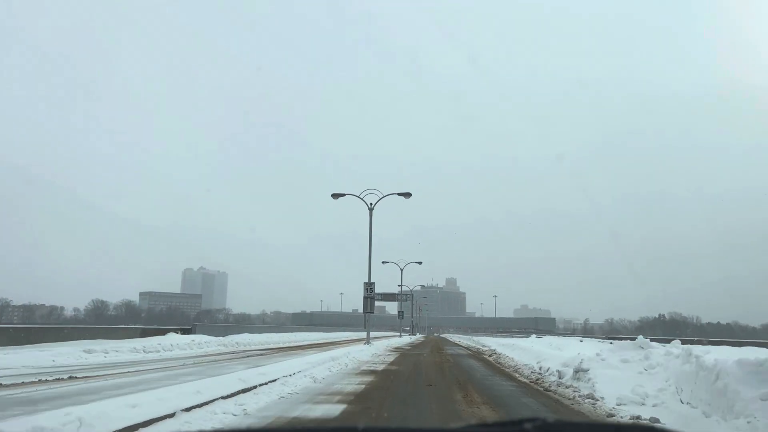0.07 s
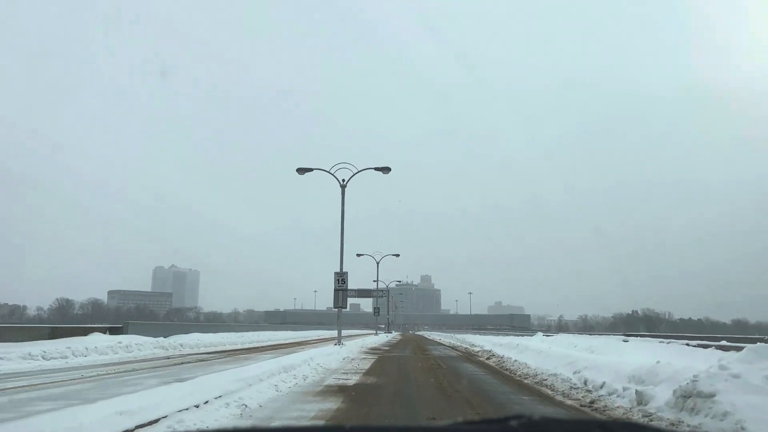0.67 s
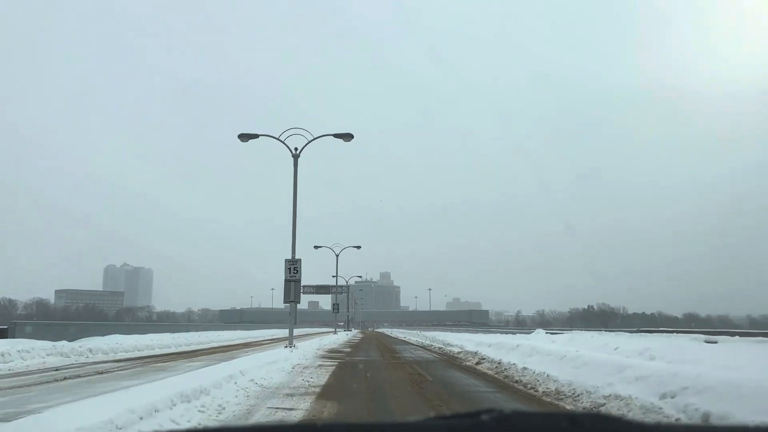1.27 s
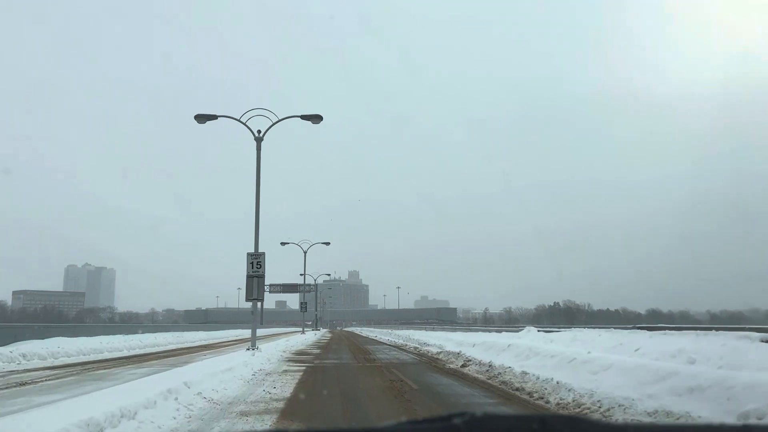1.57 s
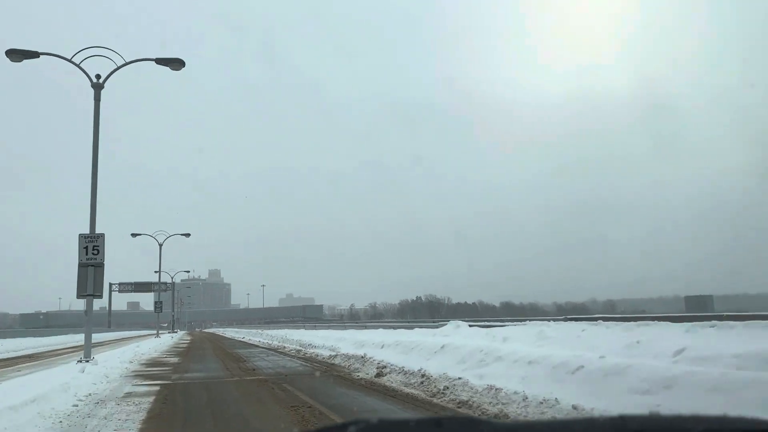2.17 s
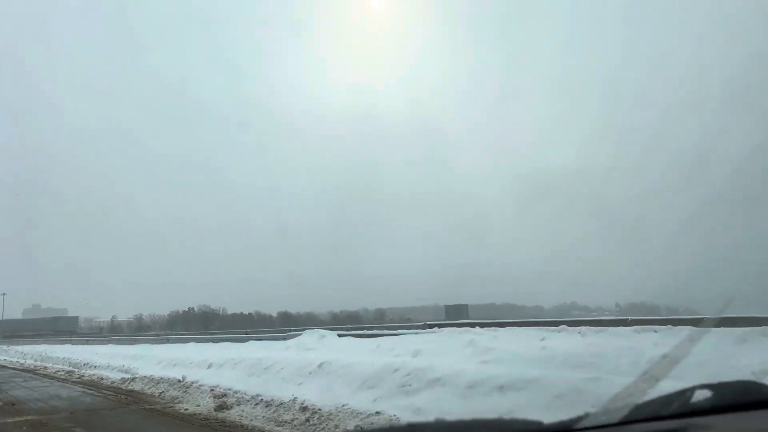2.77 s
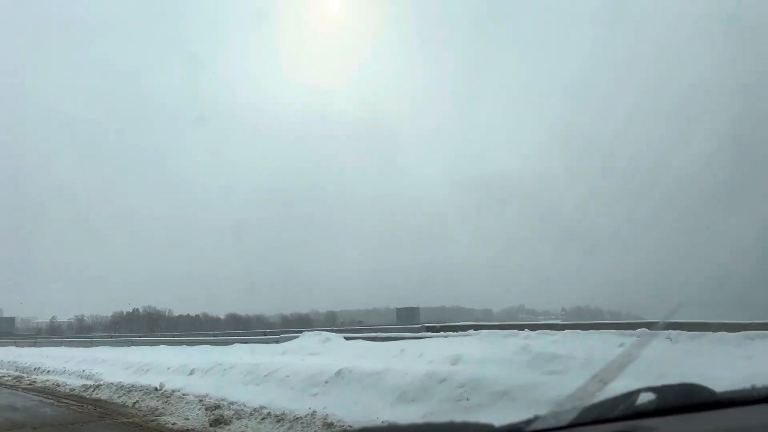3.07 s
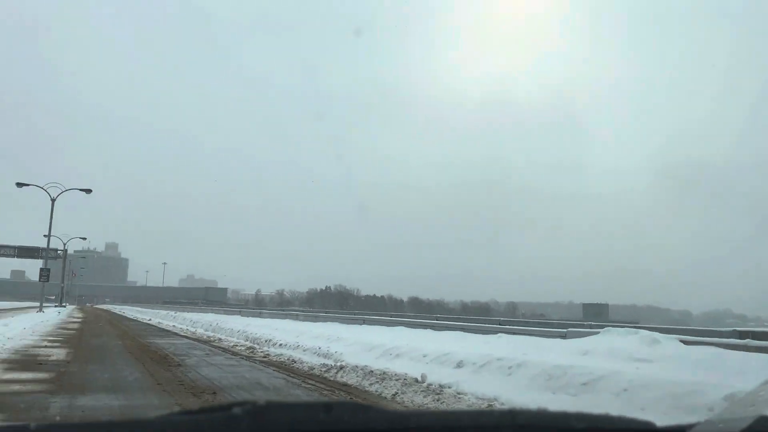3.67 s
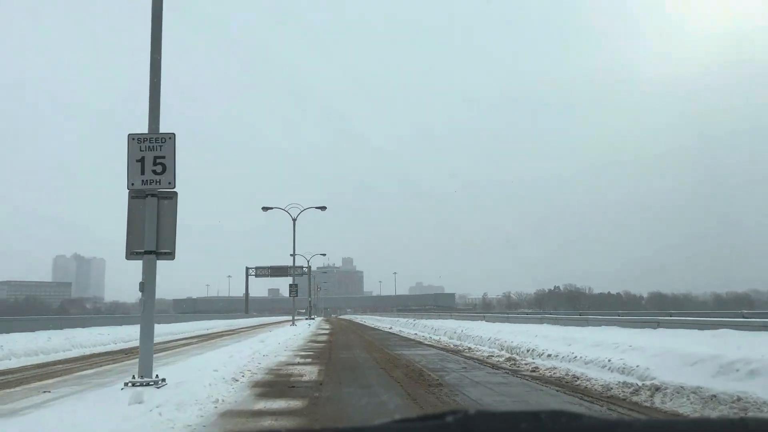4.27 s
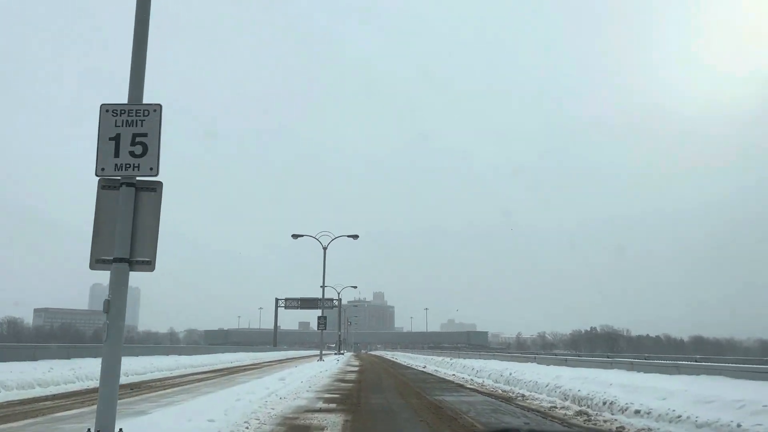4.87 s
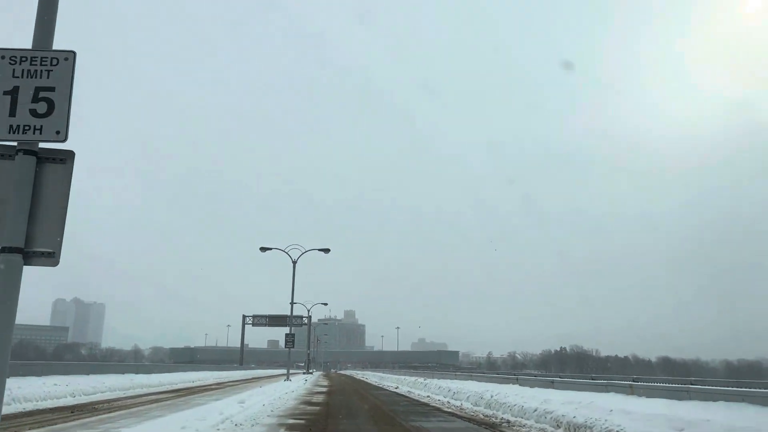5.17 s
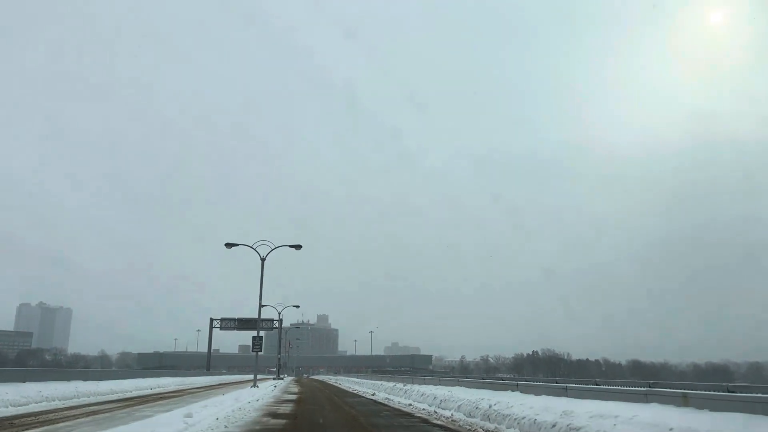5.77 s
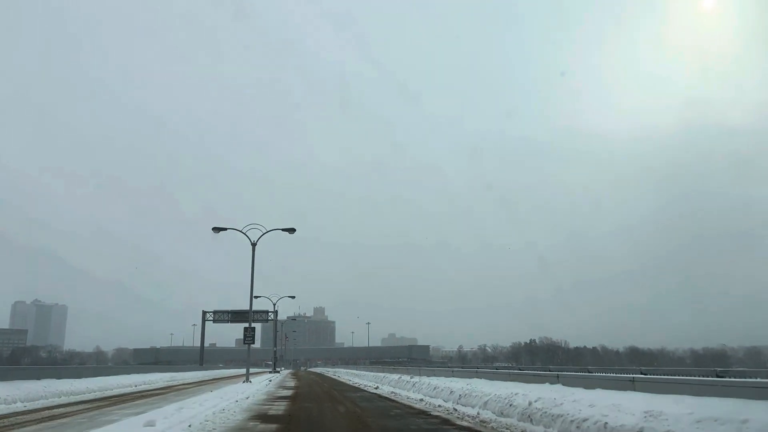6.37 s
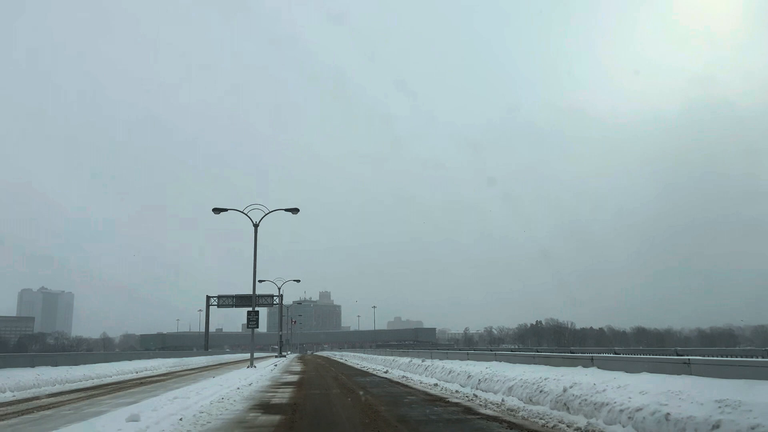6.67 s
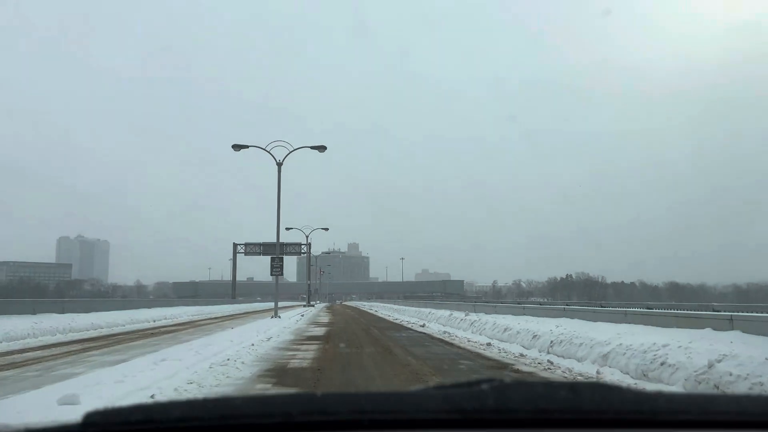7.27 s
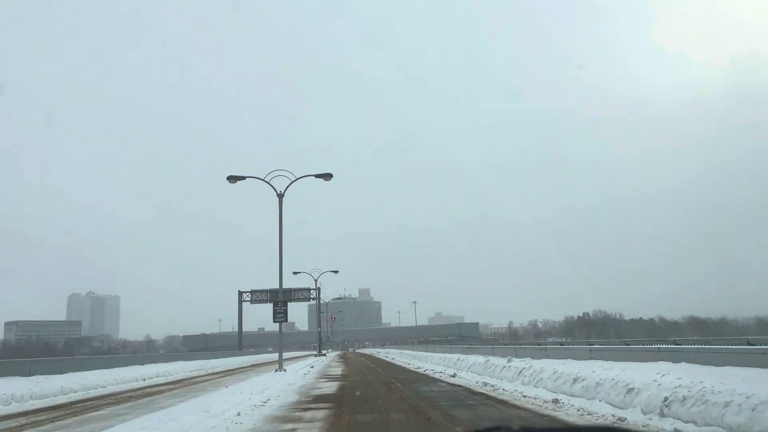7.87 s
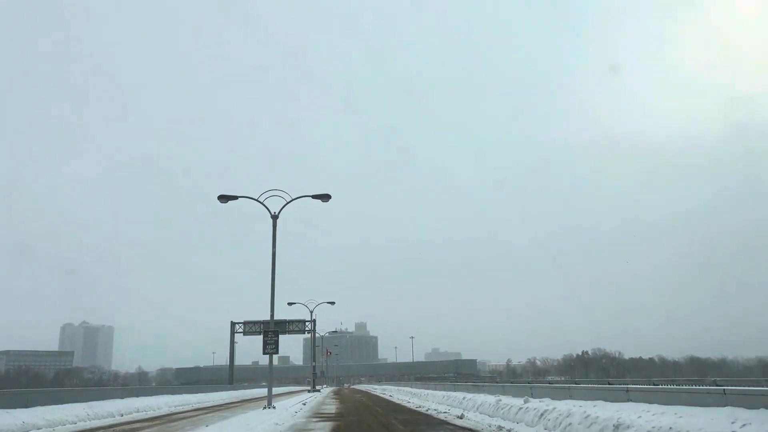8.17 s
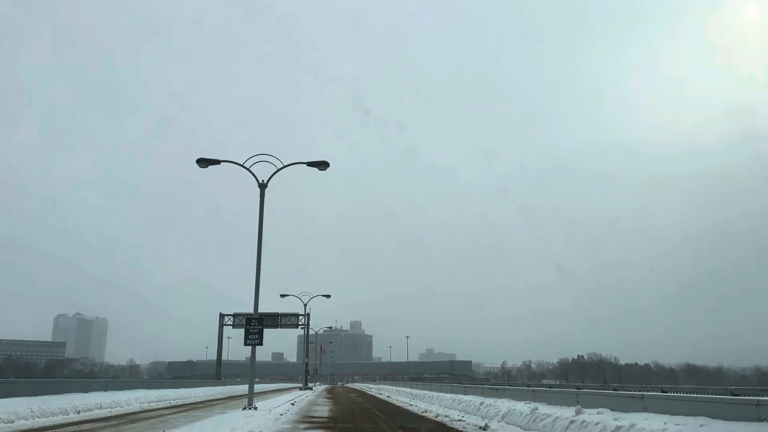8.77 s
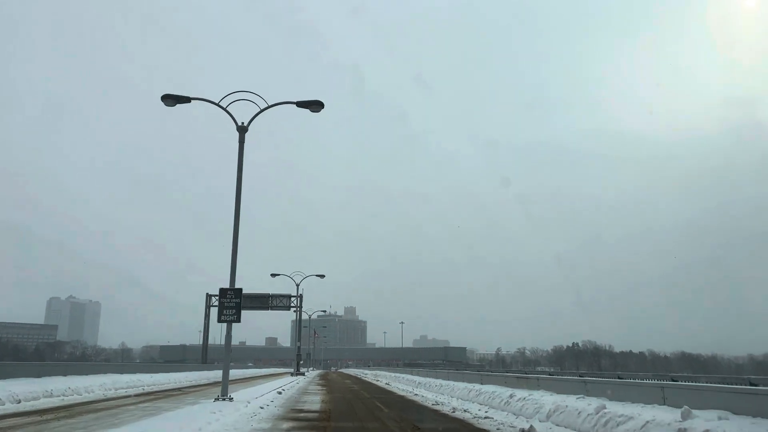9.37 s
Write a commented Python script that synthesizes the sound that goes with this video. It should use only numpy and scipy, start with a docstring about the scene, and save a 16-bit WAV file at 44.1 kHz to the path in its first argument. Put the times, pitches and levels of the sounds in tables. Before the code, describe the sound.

Deep tyre rumble and engine drone inside a car on a slushy road, with thumping bumps and rattling plastic trim.

```python
"""Inside a car on a slushy road.

Packed snow shakes the body into a deep boom and the tread into a roar; ruts thump, ribbed snow drums.
Slush crunches, hisses and sprays the wheel arches. After a rough patch the engine pulls with a faint
whine. Loose things knock, plastic trim clicks and rubs, over a thin hum and an electrical chirp."""
import sys
import numpy as np
from scipy import signal
from scipy.fft import rfft, irfft
from scipy.io import wavfile
from scipy.ndimage import uniform_filter1d

SR = 44100
rng = np.random.default_rng(int(sys.argv[2]) if len(sys.argv) > 2 else 0)


def file_out(sig):
    """Save sig as 16-bit WAV at sys.argv[1]."""
    # one column per channel
    cols = np.atleast_2d(sig).T
    # limit, then scale
    lim = np.clip(cols, -1, 1)
    pcm = np.round(lim * 32767).astype(np.int16)
    wavfile.write(sys.argv[1], SR, pcm)


N = 419832
TIME = np.arange(N) / SR
FREQ_HZ = np.fft.rfftfreq(N, 1 / SR)


def gain_of(db):
    """Decibels to amplitude."""
    return 10 ** (np.asarray(db) / 20)


def unit_rms(x):
    """Scaled to rms 1."""
    return x / np.sqrt(np.mean(x ** 2) + 1e-20)


def spectrum_at(points, hz):
    """Rows of (Hz, value) interpolated on a log-frequency axis."""
    point_hz, value = np.transpose(points)
    return np.interp(np.log(hz + 1), np.log(point_hz + 1), value)


def curve(rows, column=1):
    """One column of a timed table at every sample."""
    rows = np.asarray(rows)
    return np.interp(TIME, rows[:, 0], rows[:, column])


def add(mix, start_s, sound):
    """Lays a sound into the stereo mix."""
    part = mix[:, max(round(start_s * SR), 0):][:, :sound.shape[-1]]
    part += sound[..., :part.shape[1]]


def drift(top_hz):
    """Smooth random motion of rms 1, rolled off above top_hz."""
    return unit_rms(irfft(rfft(rng.standard_normal(N)) * np.exp(-(FREQ_HZ / top_hz) ** 2), N))


def swells(base_db, rows, column=2):
    """Steady gain plus bell-shaped swells, summed in power; rows begin with centre and length in s."""
    power = sum(gain_of(row[column]) ** 2 * np.exp(-2 * np.pi * ((TIME - row[0]) / row[1]) ** 2)
                for row in rows)
    return np.sqrt(gain_of(base_db) ** 2 + power)


def steadied(x, window_s):
    """Evens out the slow swells of a narrow noise."""
    power = uniform_filter1d(x.mean(0) ** 2, int(window_s * SR))
    return x / np.sqrt(uniform_filter1d(power, int(window_s * SR / 2)) + 1e-9)


def gritty(per_s, spread_db, share):
    """Stereo wash of tiny grains; sparse larger ones carry `share` of the power."""
    size = gain_of(spread_db * np.minimum(rng.exponential(1, (2, N)), 3))
    grains = (rng.random((2, N)) < per_s / SR) * rng.choice([-1, 1], (2, N)) * size
    return np.sqrt(1 - share) * rng.standard_normal((2, N)) + np.sqrt(share) * unit_rms(grains)


def reflected(x, echo_db=-4, size=600):
    """Early reflections off glass and dashboard smear each grain without colouring it."""
    echoes = rng.standard_normal(size) * np.exp(-4 * np.arange(size) / size)
    response = gain_of(echo_db) * unit_rms(echoes) / np.sqrt(size)
    response[0] += 1
    return irfft(rfft(x) * np.exp(1j * np.angle(rfft(response, N))), N)


def resonate(x, hz, width_hz):
    """A resonance that follows the curve hz, at rms 1."""
    carrier = np.exp(2j * np.pi * np.cumsum(hz) / SR)
    pole = np.exp(-np.pi * width_hz / SR)
    return unit_rms((carrier * signal.lfilter([1 - pole], [1, -pole], x / carrier)).real)


def ring(modes, length_s, rise_s):
    """Decaying sines of a struck object, with a soft onset."""
    t = np.arange(int(length_s * SR)) / SR
    sines = sum(gain_of(db - 60 * t / t60_s) * np.sin(2 * np.pi * hz * t) for hz, db, t60_s in modes)
    return sines * (1 - np.exp(-t / rise_s))


def note(hz, t60_s, apart_rad, rise_s=.00046):
    """A struck part's own short ring; either channel may lead."""
    t = np.arange(8192) / SR
    phase = np.array([[0], [rng.choice([-1, 1]) * apart_rad]])
    envelope = (1 - np.exp(-t / rise_s)) * gain_of(-60 * t / t60_s)
    return np.sqrt(2) * envelope * np.sin(2 * np.pi * hz * t + phase)


def mode_colour(modes, centre_hz, below_db, above_db):
    """Resonances as a function from Hz to dB, cut by below_db and above_db an octave off centre."""
    def colour_db(hz):
        power = sum(gain_of(db) ** 2 / (1 + (2 * (hz - mode_hz) / width_hz) ** 2) ** 2
                    for mode_hz, width_hz, db in modes)
        cut_db = np.where(hz < centre_hz, below_db, above_db) * np.log2(hz / centre_hz) ** 2
        return 10 * np.log10(power) - cut_db
    return colour_db


def strike(colour_db, t60_s, tail_db, shared, grit, lag_s=0., size=8192):
    """A snap and a crunch of contacts with a cabin tail, coloured; strongest 4 ms at rms 1."""
    t, hz = np.arange(size) / SR, np.fft.fftfreq(size, 1 / SR)
    noise = rng.standard_normal((3, size))
    decay = gain_of(-60 * t / t60_s) + gain_of(tail_db - 60 * t / .13)
    contacts = grit * (shared * noise[2] + (1 - shared) * noise[:2]) * decay
    contacts[:, 0] += 4  # first snap
    contacts += .4 * np.roll(contacts * (t < .1), round(.0016 * SR), axis=1)  # windscreen echo
    log_gain = np.log(gain_of(np.maximum(colour_db(abs(hz) + 1), -90)))
    causal_colour = np.exp(np.conj(signal.hilbert(log_gain)))
    bending = np.exp(-2j * np.pi * lag_s * 700 * np.arctan(hz / 700))  # low bending waves arrive later
    sound = np.fft.ifft(np.fft.fft(contacts) * bending * causal_colour).real
    return sound / np.sqrt(uniform_filter1d((sound ** 2).mean(0), size=176).max())


# Likeness of the channels. Each row: frequency in Hz, coherence from 0 to 1.
CABIN_COHERENCE = [(20, .998), (45, .99), (70, .95), (99, .89), (160, .8), (270, .42), (450, .1), (740, 0),
                   (1220, .25), (2010, .38), (3330, .37), (5500, .4), (8500, .5), (13000, .5)]
# Balance. Each row: frequency in Hz, left minus right in dB.
CABIN_BALANCE = [(60, 0), (110, 5.5), (200, 4), (380, 1.5), (700, 1), (1290, -1), (2380, -0.5), (4400, 5),
                 (8120, 4), (15000, -2)]
# Phase between the channels. Each row: frequency in Hz, left lead in radians.
CABIN_PHASE = [(30, 0), (100, -.02), (400, -.1), (1000, .3), (2000, -.6), (5000, .9), (8000, 1.6),
               (12000, .3)]


def cabin(drive, colour, modes=()):
    """Two unrelated drives, coloured by their path and partly shared between the channels."""
    left, other = rfft(drive)
    coherence = np.clip(spectrum_at(CABIN_COHERENCE, FREQ_HZ), 0, .999)
    delay = np.exp(-1j * spectrum_at(CABIN_PHASE, FREQ_HZ))
    right = (coherence * left + np.sqrt(1 - coherence ** 2) * other) * delay
    lean = gain_of(spectrum_at(CABIN_BALANCE, FREQ_HZ) / 2)
    lift_db = sum(db / (1 + (2 * (FREQ_HZ - hz) / width_hz) ** 2) for hz, width_hz, db in modes)
    path = gain_of(spectrum_at(colour, FREQ_HZ) + lift_db)
    pair = irfft(np.array([left * lean, right / lean]) * path, N)
    return pair / np.std(pair.mean(0))


def chirp(level_db=-60.5, centre_hz=7520, rate_hz=19.9):
    """A thin electrical chirp, each pulse loudest as its pitch falls."""
    cycle = 2 * np.pi * rate_hz * (TIME + .024)
    hz = centre_hz - 130 * np.sin(cycle) + 170 * drift(800)
    pulse = .3 + ((1 + np.cos(cycle)) / 2) ** 3
    return gain_of(level_db) * pulse * np.sin(2 * np.pi * np.cumsum(hz) / SR + np.array([[0], [2.1]]))


# Faint hum. Each row: time in seconds, level in dB.
HUM_LEVELS = [(0, -86), (5.9, -71), (6.3, -64), (7.6, -62), (9.5, -57)]


def tread_hum(pitch_hz=549, wander=.004, waver_db=2.0):
    """A thin wavering hum, perhaps from the tread, that sets in as the speed settles."""
    turns = np.cumsum(pitch_hz * (1 + wander * drift(8))) / SR
    level = gain_of(curve(HUM_LEVELS) + waver_db * drift(5.4))
    return np.sqrt(2) * level * np.sin(2 * np.pi * turns + np.array([[0], [1]]))


# Rubbing strokes. Each row: centre in seconds, length in seconds, level in dB, squeal in Hz.
RUB_STROKES = [(2.61, 0.31, -57, 5100), (3.41, 0.45, -63, 5150), (3.564, 0.25, -50.5, 4800),
               (3.87, 0.12, -53, 5130), (6.67, 0.17, -46.5, 6300)]
# Scrape spectrum. Each row: frequency in Hz, density in dB.
RUB_SPECTRUM = [(900, 4), (1700, 2), (2400, -1.5), (2750, -14), (3200, -1), (3700, -2.5), (4300, -3),
                (4520, -12), (4850, -6.5), (5350, -15), (5700, -10), (6200, -8), (6550, -10), (7300, -2),
                (8100, -7.5), (14000, -11)]
# Rubbed trim modes. Each row: frequency in Hz, width in Hz, lift in dB.
RUB_RESONANCES = [(2070, 160, 8), (2430, 110, 10), (4260, 160, 5.5), (4800, 120, 8), (4960, 130, 2),
                  (5600, 130, 10), (6130, 160, 5.5)]


def rubs(rough_db=1.5, squeal_db=-7, wander=.012):
    """Plastic sticks and slips on plastic; each slip rings the trim and the rubbed edge."""
    strokes = sum(gain_of(db) * np.exp(-(5.2 * (TIME - centre_s) / length_s) ** 2)
                  for centre_s, length_s, db, _ in RUB_STROKES)
    slips = gritty(per_s=340, spread_db=1.0, share=.54)
    squeal_hz = curve(RUB_STROKES, column=3) * (1 + wander * drift(25))
    squeal = gain_of(squeal_db) * resonate(slips, squeal_hz, width_hz=280)
    scrape = cabin(slips, RUB_SPECTRUM, RUB_RESONANCES)
    return (scrape + squeal) * strokes * gain_of(rough_db * drift(120))


# Metal pings. Each row: start in seconds, level in dB.
PING_HITS = [(.173, -58), (0.199, -44), (.211, -49), (0.449, -48)]
# Metal modes. Each row: frequency in Hz, level in dB, t60 in seconds.
METAL_MODES = [(5630, 3, 0.098), (5560, -6, 0.16), (5720, -8, 0.05)]


def pings():
    """A small piece of metal chatters on the first ruts."""
    out = np.zeros((2, N))
    ping = ring(METAL_MODES, length_s=.3, rise_s=.001)
    for start_s, db in PING_HITS:
        add(out, start_s, gain_of(db) * ping)
    return out


# Ticks. Each row: start in seconds, relative level in dB.
TICK_HITS = [(2.9875, -44), (3.0615, -50), (4.6, -45), (5.0863, -33), (6.61, -44), (6.671, -38),
             (6.681, -44), (6.984, -40.5), (7.074, -41), (7.1332, -45.5), (8.0623, -28.5), (8.68, -41.5),
             (8.7128, -33)]
# Tick spectrum. Each row: frequency in Hz, density in dB.
TICK_SPECTRUM = [(800, -23), (2000, 4.5), (5000, 1), (8000, 0.5), (11800, 6), (13200, -0.5), (15000, -1.5),
                 (16500, -5.5)]


def ticks(gain_db=-.5, right_lag_s=.00007):
    """Small sharp ticks close by, reaching the left channel first."""
    out = np.zeros((2, N))
    for start_s, db in TICK_HITS:
        left, right = strike(lambda hz: spectrum_at(TICK_SPECTRUM, hz),
                             t60_s=.026, tail_db=-18, shared=.26, grit=.9)
        right = np.roll(right, round(right_lag_s * SR))
        add(out, start_s, gain_of(db + gain_db) * np.array([left, right]))
    return out


def faint_clicks(count=18, level_db=-57, pitch_hz=1410, spread_db=7, snap_db=-13.5, ring_db=-17):
    """Random rows like TRIM_CLICKS, likelier and stronger on a rough surface."""
    rough_db = curve(ROAD_SURFACE)
    odds = np.cumsum(gain_of(rough_db) ** 4)
    when, size, octave = rng.random((count, 3)).T
    starts = np.searchsorted(odds, when * odds[-1])
    levels_db = level_db + rough_db[starts] + spread_db * (2 * size - 1)
    pitches_hz = pitch_hz * 2 ** (octave - .5)
    return [(s, db, hz, snap_db, ring_db, 0) for s, db, hz in zip(starts / SR, levels_db, pitches_hz)]


# Trim clicks. Each row: start in seconds, level in dB, pitch in Hz, then snap, ring, thud in relative dB.
TRIM_CLICKS = [(.111, -39, 1210, -18, -2, -7), (.138, -55, 5200, 0, -10, 13), (.199, -48, 2400, -8, -6, 0),
               (.449, -44, 2100, -6, -12, 3), (.462, -47, 2610, -1, -8, -1), (.53, -48, 2420, 1, -4, -6),
               (0.6, -48.5, 1700, 2.5, -10, -4), (.697, -41, 1350, -5.5, -3, -5),
               (.919, -50, 2370, -3, -3, -6), (1.447, -44, 1230, -20, -2, -6),
               (1.603, -44.5, 1300, -12, -14, 1), (1.672, -57.5, 2460, 7.5, -10, -4),
               (1.819, -47, 1100, -20, -6, -5), (2.215, -55, 2750, 2, -14, -4),
               (3.352, -51, 1400, -16, -6, 9), (3.456, -46, 1400, -20, -10, -2),
               (3.463, -40, 1360, -22, -8, -7), (3.492, -41, 2870, -8, -3, 1),
               (3.559, -49, 1700, -10, -8, -6), (4.643, -38, 1240, -13, -9, -2),
               (4.699, -47, 1300, -5, -12, 4), (4.8, -42, 1180, -22, -6, -6),
               (4.823, -46, 1600, 2.5, -15, 8), (4.961, -44.5, 1280, -20, -2, -7),
               (5.023, -51, 4340, -8, 5, 8), (5.089, -34, 1950, -8, -1, 1), (5.094, -43, 2060, -12, 4, -4),
               (5.137, -43, 4700, -9, -2, 4), (5.142, -36, 1800, -6, -3, 1), (5.153, -41, 1920, -3, -6, -1),
               (5.276, -39.5, 4990, -12, -4, -9), (5.647, -44.5, 1300, -3.5, -14, 8),
               (5.664, -47, 2220, -3, -8, 0), (5.683, -47, 2320, 1.5, -8, -1),
               (6.502, -50, 1230, -20, 11, 4), (6.603, -40, 1290, -22, 1, 0),
               (6.61, -33.5, 1980, -17, 0, -2), (6.646, -37, 1640, -1, -11, -8),
               (6.665, -32.5, 2490, -0.5, 2, -4), (6.672, -37, 6300, -1, 3, 3),
               (6.676, -37, 2740, -9, 0, -2), (6.681, -40, 2090, -1, -10, -2),
               (7.078, -52.5, 1830, -20, 11.5, 0), (7.169, -51, 1650, -20, -3, -3),
               (7.274, -56.5, 4200, -4, -8, -8), (7.629, -47, 1190, -6, -10, 10),
               (8.063, -40.5, 1300, -3, -8, -8), (8.609, -43, 1250, -17, -9, 3),
               (8.679, -39, 1640, -21, -8, -14), (8.712, -29, 1830, -18, -3, -3)]
# Plastic trim modes. Each row: frequency in Hz, width in Hz, level in dB.
PLASTIC_MODES = [(577, 140, 2), (1277, 470, 0), (1823, 950, -7), (2320, 1400, -4.5), (3330, 550, -9),
                 (3800, 230, -22), (4800, 1800, -11), (6160, 370, -12), (7660, 3400, -13.5),
                 (13000, 4000, -12)]


def clicks(snap_hz=3950, thud_hz=600, left_minus_right_db=-2.5):
    """Plastic parts let go with a bright snap and click against hollow panels."""
    out = np.zeros((2, N))
    lean = gain_of(np.array([[.5], [-.5]]) * left_minus_right_db)
    snap_colour = mode_colour(PLASTIC_MODES, snap_hz, below_db=6, above_db=6)
    thud_colour = mode_colour(HOLLOW_MODES, thud_hz, below_db=4, above_db=4)
    for start_s, db, pitch_hz, snap_db, ring_db, thud_db in TRIM_CLICKS + faint_clicks():
        part_colour = mode_colour(PLASTIC_MODES, pitch_hz, below_db=12, above_db=33)
        part = strike(part_colour, t60_s=.04, tail_db=-21.5, shared=.33, grit=1.0)
        snap = gain_of(snap_db) * strike(snap_colour, t60_s=.035, tail_db=-25, shared=.4, grit=.45)
        thud = gain_of(thud_db) * strike(thud_colour, t60_s=.03, tail_db=-30, shared=.3, grit=.6)
        tone = gain_of(ring_db) * note(pitch_hz, t60_s=.026, apart_rad=1.3)
        add(out, start_s, gain_of(db) * (lean * (part + tone) + snap + thud))
    return out


# Knocks. Each row: start in seconds, level in dB, pitch in Hz, then edge and ring in relative dB.
KNOCK_HITS = [(1.763, -31.5, 696, -30, -3), (1.772, -41, 400, -28, -2), (3.216, -35.5, 694, -13, -5),
              (3.464, -39, 633, -24, 3), (3.493, -41, 700, -24, 0), (3.558, -40, 650, -9, -4),
              (3.65, -39, 564, -11.5, -3), (3.669, -45, 645, -26, -7), (3.717, -38.5, 670, -28, -1),
              (3.742, -36, 625, -16, 1), (3.955, -35.5, 575, -21, -10), (3.999, -41, 520, -5.5, -5),
              (4.036, -43.5, 520, -6.5, -5), (4.068, -47, 520, -9, -8), (6.661, -37, 422, -3, 12.5),
              (6.791, -39.5, 570, -6.5, 16.5)]
# Hollow panel modes. Each row: frequency in Hz, width in Hz, level in dB.
HOLLOW_MODES = [(400, 150, 19), (596, 610, 10.5), (760, 110, 7), (940, 380, 5), (1500, 660, -4.5)]


def knocks(edge_hz=2900):
    """Loose things knock hollowly, each with a short hard edge and a note of its own."""
    out = np.zeros((2, N))
    edge_colour = mode_colour(PLASTIC_MODES, edge_hz, below_db=6, above_db=6)
    for start_s, db, pitch_hz, edge_db, ring_db in KNOCK_HITS:
        hollow_colour = mode_colour(HOLLOW_MODES, pitch_hz, below_db=4, above_db=4)
        hollow = strike(hollow_colour, t60_s=.035, tail_db=-30, shared=.4, grit=.5, lag_s=.003)
        edge = gain_of(edge_db) * strike(edge_colour, t60_s=.054, tail_db=-34, shared=.19, grit=1.0)
        tone = gain_of(ring_db) * note(pitch_hz, t60_s=.036, apart_rad=1.66)
        add(out, start_s, gain_of(db) * (hollow + edge + tone))
    return out


# Water under the tread. Each row: time in seconds, hiss in dB.
HISS_LEVELS = [(0, -54), (.5, -52.5), (2.3, -55.5), (2.8, -63), (3.25, -62.5), (3.55, -59.5), (4.35, -63.5),
               (4.6, -59.5), (4.82, -51.5), (5.14, -53), (5.4, -56.5), (6.1, -59), (7.5, -55.5), (9.5, -56)]
# Slush thrown at the arches. Each row: centre in seconds, length in seconds, spray in dB.
SLUSH_PATCHES = [(.16, 0.076, -63.5), (0.624, 0.72, -57.5), (1.354, 0.62, -62.5), (1.588, 0.092, -57),
                 (2.15, 1.7, -68), (3.543, 0.96, -66.5), (4.068, 0.39, -63.5), (4.807, 0.17, -56),
                 (5.173, 0.43, -52.5), (5.227, 0.041, -51.5), (5.597, 0.55, -63), (6.17, 0.053, -62),
                 (6.68, 0.55, -66), (8.99, 0.32, -62), (9.342, 0.35, -57)]
# Spectra of snow, water and spray. Each row: frequency in Hz, density in dB.
CRUNCH_SPECTRUM = [(100, -28), (280, 2), (400, 3.5), (480, 1), (560, 2), (680, -4.5), (900, -6), (1060, -9),
                   (1250, -34.5), (1600, -34), (4000, -46.5), (9000, -76)]
HISS_SPECTRUM = [(200, -37.5), (680, 10), (1050, 9), (1160, 3.5), (1260, 5.5), (1500, 3), (1620, 2),
                 (1820, 3), (2050, -2.5), (2450, -7), (2800, -9.5), (3200, -10), (4500, -19), (9000, -36)]
SPRAY_SPECTRUM = [(200, -36.5), (900, -19.5), (2200, -3.5), (3300, -0.5), (5000, -1), (6500, 2), (8300, -3),
                  (12500, 0), (15000, -7.5), (16000, -14)]
# Wheel arch modes. Each row: frequency in Hz, width in Hz, lift in dB.
ARCH_RESONANCES = [(1350, 110, 0), (2190, 98, 3.5), (2406, 170, 6), (2750, 110, 4.5), (3220, 250, 2),
                   (3650, 100, 1), (4250, 120, 1.5), (4650, 140, 6), (5170, 120, 6)]


def slush(crunch_db=-53, spray_db=-72, rut_lift_db=4.0):
    """Snow crunches and water hisses under the tread; icy spray peppers the arches. Ruts splash."""
    clods = gritty(per_s=250, spread_db=3, share=.3)
    drops = gritty(per_s=260, spread_db=3.6, share=.45)
    ice = gritty(per_s=600, spread_db=4, share=.55)
    clods, drops, ice = reflected(clods), reflected(drops), reflected(ice)
    flutter_db = .8 * drift(45) + .6 * drift(8)  # slush lies in patches
    splash_db = rut_lift_db * sum(np.exp(-((TIME - start_s - .012) / .02) ** 2) for start_s, _ in RUTS)
    load_db = curve(ENGINE_RUN, column=2)
    bite_db = .96 * curve(ROAD_SURFACE) + .29 * (load_db - load_db.min())  # driven tyres bite harder
    crunch = cabin(clods, CRUNCH_SPECTRUM) * gain_of(crunch_db + bite_db + .5 * splash_db)
    hiss = cabin(drops, HISS_SPECTRUM, ARCH_RESONANCES) * gain_of(curve(HISS_LEVELS) + 1.33 * splash_db)
    spray_gain = swells(spray_db, SLUSH_PATCHES) * gain_of(splash_db)
    spray = cabin(ice, SPRAY_SPECTRUM, ARCH_RESONANCES) * spray_gain
    return (crunch + hiss + spray) * gain_of(flutter_db)


# Engine state. Each row: time in seconds, firing rate in Hz, load in dB, whine in dB.
ENGINE_RUN = [(0, 49.59, -38.5, -88), (4.6, 50.11, -35.5, -73.5), (5.2, 57.5, -23.5, -75),
              (5.42, 58.32, -25.5, -54.5), (5.66, 60.29, -27, -59), (5.88, 55.07, -31.5, -53.5),
              (6.1, 52.66, -29, -53), (6.42, 51.83, -22.5, -59.5), (6.85, 52.59, -25, -57.5),
              (7.2, 54.23, -28.5, -55.5), (7.6, 52.77, -24.5, -68), (8.05, 51.82, -25, -71),
              (8.55, 50.66, -23.5, -68), (8.95, 50.02, -24, -75), (9.52, 50.04, -23.5, -82)]
# Drone and whine partials. Each row: multiple of the firing rate, relative level in dB.
DRONE_PARTIALS = [(1, -1), (2, -16), (3, -23.5), (4, -27), (5.1, -26), (6.5, -35.5), (8.4, -33.5),
                  (11, -41.5)]
WHINE_PARTIALS = [(7.55, -2.5), (11.35, 2), (15.1, -7.5)]


def engine(waver_db=1.5, flutter_db=2.0, jitter=.0039, shake=.01208):
    """Firing orders drone through the body; belt-driven parts whine at fixed ratios."""
    out = np.zeros((2, N))
    firing_hz = curve(ENGINE_RUN) * (1 + jitter * drift(11.2) + shake * drift(69))
    turns = np.cumsum(firing_hz) / SR
    load_db = curve(ENGINE_RUN, column=2)
    whine_db = curve(ENGINE_RUN, column=3) + flutter_db * drift(14)
    for partials, level_db in (DRONE_PARTIALS, load_db), (WHINE_PARTIALS, whine_db):
        for order, db in partials:
            offset_turns = rng.random() + np.array([[0], [.006]]) * order ** 1.5
            level = gain_of(level_db + db + waver_db * drift(5.3))
            out += np.sqrt(2) * level * np.sin(2 * np.pi * (order * turns + offset_turns))
    return out


# Ribbed snow. Each row: centre in seconds, length in seconds, drumming rate in Hz, level in dB.
SNOW_RIBS = [(3.028, 0.8, 72.6, -33), (7.97, 0.39, 68, -21), (8.918, 0.29, 69.2, -17.5)]


def washboard(wander=.016):
    """Ribbed snow drums the body at a near-even rate, throbbing against the engine's drone."""
    out = np.zeros(N)
    slip = 1 + wander * drift(5.3)
    for centre_s, length_s, hz, db in SNOW_RIBS:
        envelope = gain_of(db) * np.exp(-np.pi * ((TIME - centre_s) / length_s) ** 2)
        out += envelope * np.sin(2 * np.pi * np.cumsum(hz * slip) / SR)
    return out


# Wheels dropping into ruts. Each row: start in seconds, peak level in dB.
RUTS = [(0.137, -9.5), (0.184, -33), (0.44, -3.5), (0.484, -14), (5.085, -40), (5.164, -3), (5.234, -17),
        (5.658, -12), (5.714, -36), (8.064, -19.5)]
# Modes of panels, cabin air and tyre air. Each row: frequency in Hz, level in dB, t60 in seconds.
BODY_MODES = [(47.2, -1.5, 0.17), (76, 3, 0.1), (95, -5, 0.087), (233, -7.5, 0.087)]


def bumps():
    """A rut kicks the suspension and the body rings briefly; the tyre cushions the onset."""
    out = np.zeros((2, N))
    thump = ring(BODY_MODES, length_s=.4, rise_s=.0016)
    for start_s, db in RUTS:
        add(out, start_s, gain_of(db) * thump / abs(thump).max())
    return out


# Road grain and waves. Each row: time in seconds, roughness in dB, unevenness in dB.
ROAD_SURFACE = [(0, 3, 2), (.9, 1, 4), (1.4, 1.5, 0.5), (2.35, -2, -4.5), (2.75, -5, 1), (3.7, -2.5, -1.5),
                (4.45, -8, -1.5), (4.85, 6, 3), (5.1, 6.5, -6), (5.45, -2.5, -3.5), (6.2, -2, -5.5),
                (7.3, -0.8, -2), (7.7, -0.5, -0.5), (9.5, -1.5, 2.5)]
# Packed ridges. Each row: centre in seconds, length in seconds, boom in dB, roar in dB.
SNOW_RIDGES = [(0.17, 0.15, -12, -24.5), (0.473, 0.11, -9.5, -26.5), (0.76, 0.11, -16.5, -28.5),
               (0.986, 0.22, -25, -33.5), (1.657, 0.13, -24.5, -34.5), (1.788, 0.028, -51, -26),
               (2.374, 0.42, -23.5, -35), (4.991, 0.075, -15, -33), (5.189, 0.21, -12.5, -27.5),
               (5.726, .18, -17, -30.5), (8.545, 0.057, -17.5, -41), (8.917, 0.18, -26, -40)]
# Spectra of body and tread. Each row: frequency in Hz, density in dB.
BOOM_SPECTRUM = [(10, -58.5), (20, -21), (30, 2), (42, 3), (50, 4), (60, 2), (72, 3.5), (95, -1.5),
                 (125, -15.5), (170, -19), (300, -72)]
ROAR_SPECTRUM = [(20, -68.5), (70, -8), (138, 2.5), (175, -3.5), (240, -7), (290, -12), (350, -14.5),
                 (450, -22), (700, -38), (1500, -65), (8000, -84)]


def road(boom_db=-24, roar_db=-36, rock_db=2.0, rock_hz=19, lump_db=1.5):
    """Waves in packed snow make the body boom, its grain makes the tread roar; both swell on ridges."""
    uneven_db = curve(ROAD_SURFACE, column=2) + rock_db * drift(rock_hz)
    boom_gain = swells(boom_db + uneven_db, SNOW_RIDGES, column=2)
    roar_gain = swells(roar_db + .95 * curve(ROAD_SURFACE), SNOW_RIDGES, column=3)
    lumps = gain_of(lump_db * drift(35))
    boom = steadied(cabin(rng.standard_normal((2, N)), BOOM_SPECTRUM), window_s=.15)
    roar = steadied(cabin(rng.standard_normal((2, N)), ROAR_SPECTRUM), window_s=.18)
    return boom_gain * boom + roar_gain * lumps * roar


def scene():
    """Everything heard from the front seat."""
    driving = road() + washboard() + slush() + engine() + tread_hum() + bumps()
    interior = knocks() + clicks() + ticks() + pings() + rubs() + chirp()
    return signal.windows.tukey(N, .001) * (driving + interior)


def record(dry, low_hz=32.5, notch_hz=10200, notch_width_hz=2000, notch_db=-26.5, top_hz=16000):
    """The lowest bass is cut, a band near 10 kHz is filtered out, peaks are rounded; then a low-pass."""
    low_cut = FREQ_HZ ** 4 / np.sqrt(FREQ_HZ ** 8 + low_hz ** 8)
    notch = gain_of(notch_db * np.exp(-(2 * (FREQ_HZ - notch_hz) / notch_width_hz) ** 4))
    coloured = irfft(rfft(dry) * low_cut * notch, N)
    rounded = coloured / (1 + (coloured / .9) ** 6) ** (1 / 6)
    low_pass = signal.firwin(511, top_hz, window=("kaiser", 9), fs=SR)
    return signal.oaconvolve(rounded, low_pass[None], "same")


dry = scene()
out = record(dry)
file_out(out)
```